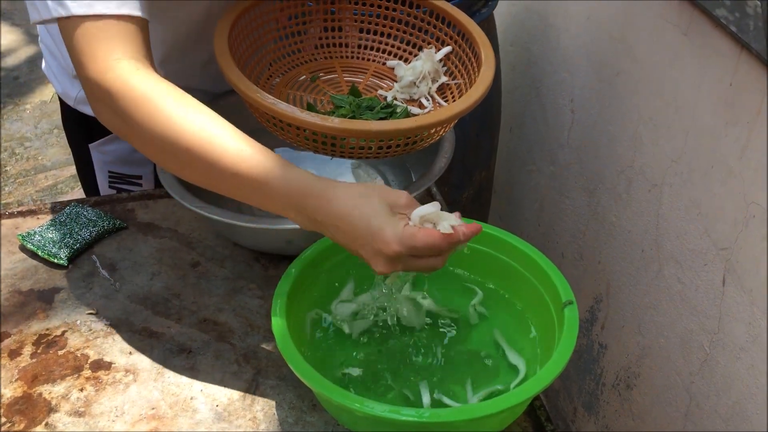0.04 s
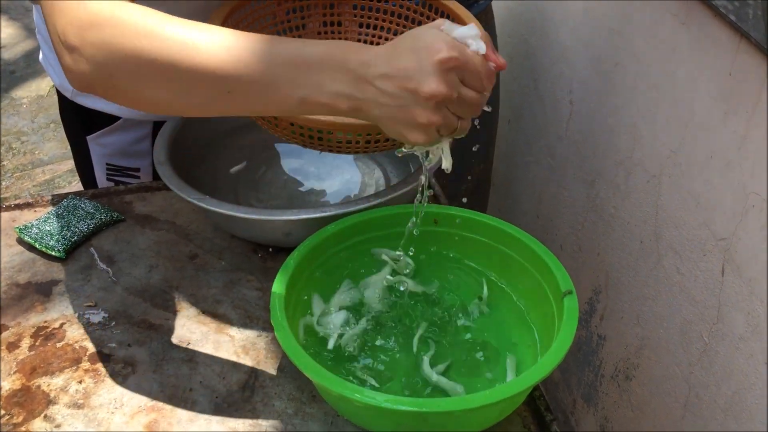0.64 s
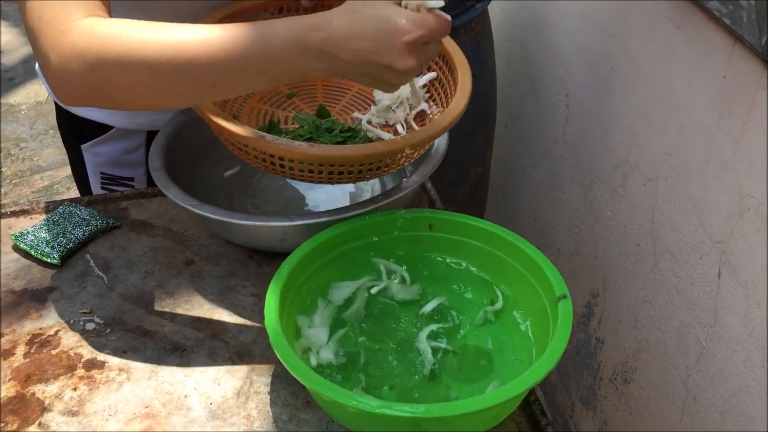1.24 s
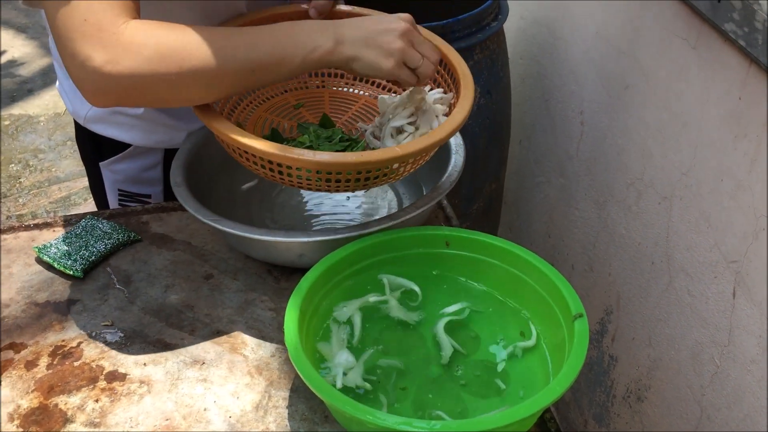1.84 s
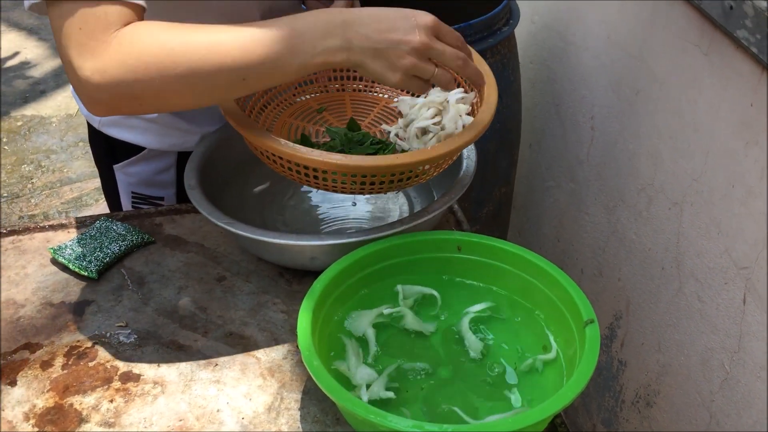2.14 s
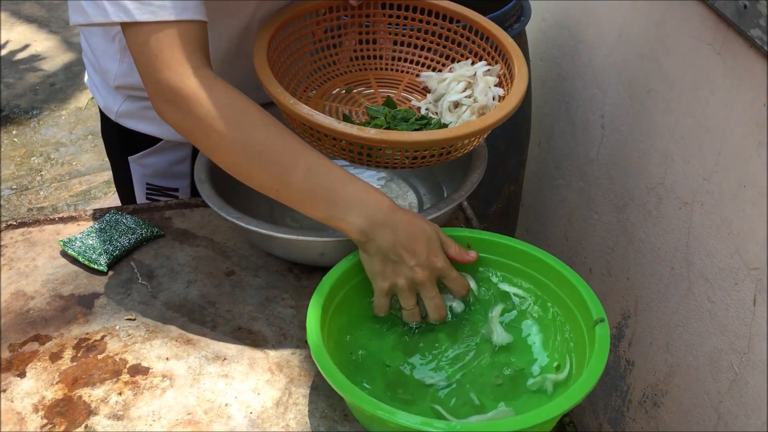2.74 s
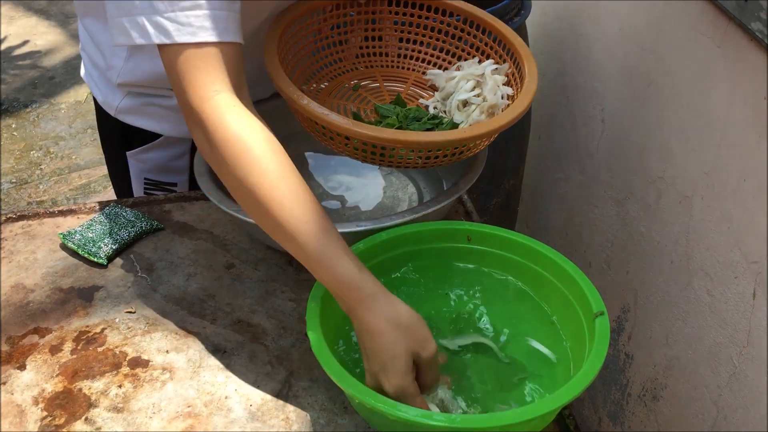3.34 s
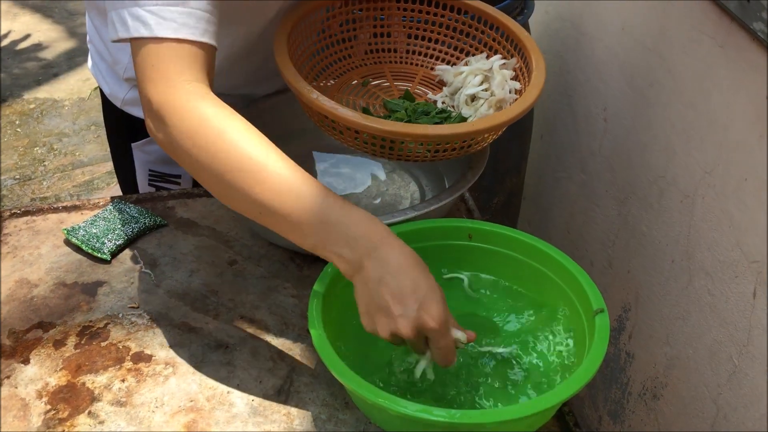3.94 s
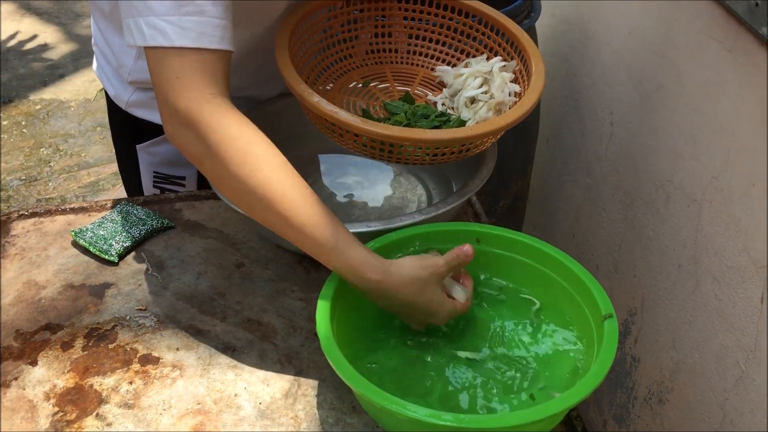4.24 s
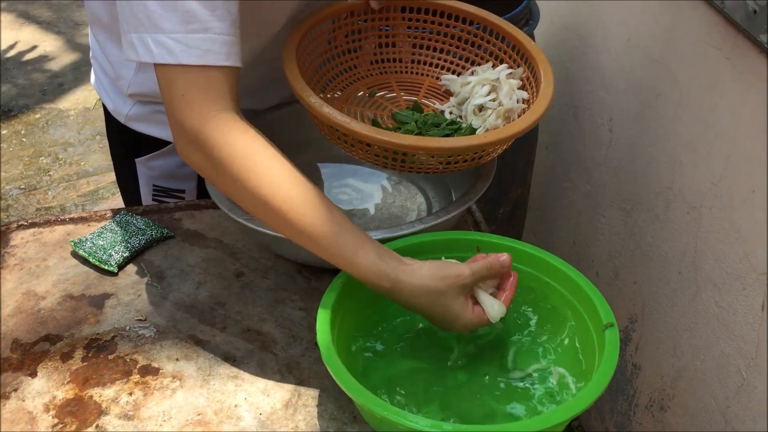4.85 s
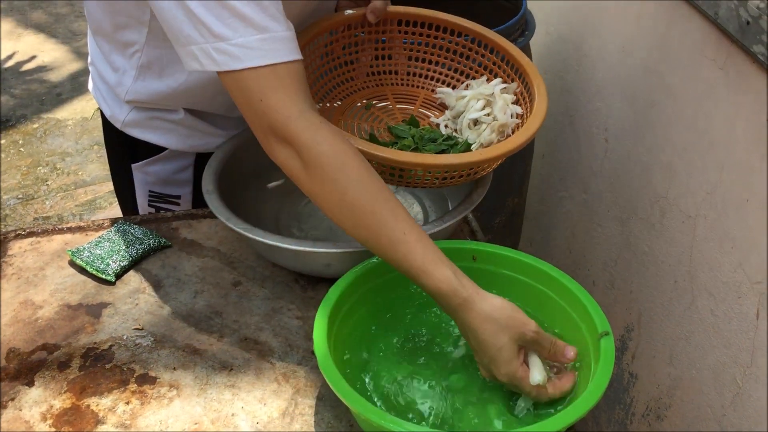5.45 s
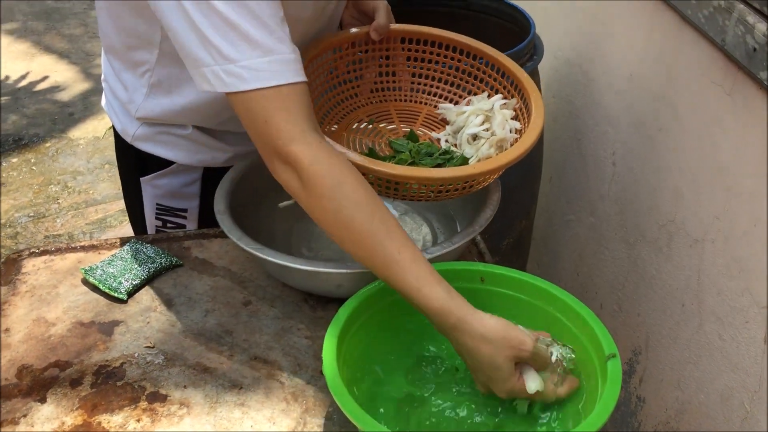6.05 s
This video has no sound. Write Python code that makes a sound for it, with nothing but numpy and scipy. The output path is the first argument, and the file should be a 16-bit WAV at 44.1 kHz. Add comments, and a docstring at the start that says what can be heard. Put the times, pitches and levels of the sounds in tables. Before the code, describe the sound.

Close by, water trickles and plinks into a plastic basin as a hand squeezes wet vegetable strips. After a short lull, the hand dips back in and sweeps around, making small splashes, gulps and drips. Small birds chirp throughout the outdoor yard, and a rooster crows once, faintly, in the second half. Far-off engines hum underneath, one of them passing by.

```python
"""Water trickles and drips into a plastic basin as a hand squeezes vegetable strips, while small birds
chirp between yard walls and an engine drones far off. The hand then dips and sweeps for more.
The water sounds chiefly through trapped air: each bubble is a damped resonator, higher when smaller.
A faint, hollow sound swells in the distance; later a rooster crows once, a harmonic tone turning hoarse
in the middle, and a second engine passes, slowing as it goes."""
import sys
import numpy as np
from scipy import signal
from scipy.fft import rfft, irfft, next_fast_len
from scipy.io import wavfile
from scipy.ndimage import map_coordinates

SR = 44100
rng = np.random.default_rng(int(sys.argv[2]) if len(sys.argv) > 2 else 0)


def transcribe(signal):
    """Save signal, clipped to [-1, 1], as a 16-bit WAV file at the path in sys.argv[1]."""
    frames = np.atleast_2d(signal).T
    limited = np.clip(frames, -1, 1)
    pcm = np.round(limited * 32767).astype(np.int16)
    wavfile.write(sys.argv[1], SR, pcm)


N = 272979

# Levels in the tables are relative: each source applies its own gain.
# spectrum of distant traffic and air: (frequency [Hz], spectral level [dB])
RUMBLE_SPECTRUM = [(20,-32), (35,-26), (52,-4.5), (75,0.5), (115,-2.5), (160,-10), (220,-19), (430,-20),
                   (650,-28), (900,-25), (2000,-31), (10000,-41.5), (16000,-48.5)]
# the near bird's falling chirps: (time [s], duration [s], end frequency [Hz], level [dB])
NEAR_BIRD_CHIRPS = [(0,0.041,3850,-38.5), (0.526,0.056,3960,-42.5), (2.836,0.06,4570,-47.5),
                    (3.548,0.048,3980,-41), (4.373,0.06,3600,-40.5), (4.816,0.071,3650,-38.5),
                    (5.573,0.056,4220,-41), (5.985,0.047,3810,-42.5)]
# the far bird's run of quick chirps: (time [s], level [dB])
FAR_BIRD_CHIRPS = [(3.051,-49.5), (3.291,-42.5), (3.522,-41), (3.747,-39.5), (3.958,-39.5), (4.171,-40.5),
                   (4.619,-39), (5.093,-40.5)]
# thin, drawn-out peeps: (time [s], start frequency [Hz], fall [octaves], level [dB])
BIRD_PEEPS = [(0.401,5000,0.094,-59), (1.099,4515,0.136,-57.5), (1.259,5040,0.081,-63.5),
              (1.753,5400,0.1,-66), (1.99,6140,0.24,-68), (2.049,4800,0.27,-64), (3.081,4390,0.0513,-45),
              (3.893,4220,0.014,-49.5), (5.184,5035,0.28,-48), (5.79,5220,0.14,-64)]
# drops striking the water: (time [s], level [dB], centre frequency [Hz])
DROP_IMPACTS = [(0.206,-43.5,8600), (0.2602,-32,5000), (0.3184,-46,10500), (0.3758,-46,6950),
                (.518,-30.5,3740), (0.57,-40,5400), (0.643,-45,7060), (0.6766,-29,8600),
                (0.7548,-40.5,9900), (0.844,-38.5,6200), (0.866,-55,13000), (.882,-38,3950),
                (0.8873,-32,4480), (0.9196,-40,10300), (1.049,-39,8450), (1.0768,-42.5,7500),
                (1.563,-55,6040), (2.6615,-44,9700), (2.7392,-50.5,6100), (3.3558,-48,8600),
                (3.397,-47,7300), (4.061,-52,10400), (4.1407,-41.5,3560), (4.174,-49,6100),
                (4.711,-53,6000), (5.049,-33,7680), (5.325,-38,6100), (5.422,-36.5,4870),
                (5.438,-50.5,4960), (5.757,-49,2900)]
# air pockets trapped by drops and by the hand:
# (time [s], frequency [Hz], level [dB], life [cycles], initial rise [octaves per 20 ms])
AIR_POCKETS = [(.167,2245,-41,55,0), (0.273,1764,-34.5,97,0.12), (0.323,2680,-40,175,2.36),
               (0.377,2640,-36.5,86,0.88), (0.387,1280,-46,99,1.1), (.398,2090,-45,124,0.051),
               (0.455,1263,-47.5,88,0), (0.521,1302,-43.5,190,0.086), (.569,1646,-28,21,0.046),
               (0.683,1814,-31.5,52,1.13), (.785,3110,-48.5,350,2), (0.817,2015,-36.5,120,0),
               (0.849,2680,-36,60,0.28), (0.89,2210,-35,34,0), (.896,1310,-47,75,0.14),
               (.911,4060,-33,52,0), (0.924,1860,-44,58,0.63), (0.94,982,-36,98,0.17),
               (1.039,3240,-36,38,0.17), (1.064,1880,-46,75,0.031), (1.079,2330,-39.5,90,0.37),
               (2.662,1316,-39.5,26,0), (2.813,2390,-54,100,0.089), (3.129,1700,-43.5,77,0.036),
               (3.179,1855,-49,180,0.35), (3.427,1620,-56,43,0), (3.552,2130,-26.5,18,0.085),
               (3.571,960,-39.5,24,0), (3.769,1810,-38.5,48,0.079), (4.364,3570,-43.5,85,0.86),
               (4.456,1740,-39,25,0.36), (4.472,2780,-35,61,0), (4.524,2604,-38,49,0.28),
               (4.628,3970,-40.5,180,0.29), (4.91,1390,-45,60,.22), (5.026,2620,-41.5,72,0),
               (5.182,2990,-43,100,0.48), (5.29,1590,-44,65,0.22), (5.422,2873,-45,200,0),
               (6.013,1843,-48.5,170,0.027), (6.079,440,-41.5,21,0)]
# spectrum of spray: (frequency [multiples of the centre], spectral level [dB])
SPRAY_SPECTRUM = [(.1, -87), (.35, 4), (.65, 1), (1.3, 4.5), (2.3, 4), (4, -16), (9, -46)]
# water spitting from between fingers and wet strips: (time [s], duration [s], level [dB])
SPIT_BURSTS = [(0.437,0.033,-50.5), (0.57,0.038,-55), (0.991,0.073,-48), (1.272,0.06,-63.5),
               (3.824,0.035,-50), (4.063,0.13,-54.5), (4.656,0.064,-58.5), (5.306,0.041,-49.5)]
# spectrum of the faint, hollow sound far off: (frequency [Hz], spectral level [dB])
FAR_SOUND_SPECTRUM = [(200, -23), (290, 7.5), (600, -15), (950, 0.5), (1500, -19), (3000, -45)]
# envelope of the hand's stirring: (time [s], level [dB])
STIR_ENVELOPE = [(2.4,-71.5), (3.02,-70), (3.25,-112), (3.42,-59), (3.68,-66), (3.85,-62), (4.33,-70),
                 (4.5,-61), (5.3,-64.5), (5.55,-66), (5.95,-72.5), (6.15,-63)]
# the hand slaps or scoops the water: (time [s], rise time [s], spray level [dB], plunge level [dB])
HAND_SPLASHES = [(2.592,0.0051,-49.5,-45.5), (2.64,0.022,-57,-53.5), (2.959,0.055,-60.5,-57),
                 (3.466,0.0064,-51,-54.5), (3.55,0.024,-54,-64), (4.191,0.0032,-30.5,-38.5),
                 (4.432,0.018,-43,-66), (4.785,0.021,-46,-53), (5.246,0.017,-48.5,-36.5),
                 (5.315,0.004,-68,-47), (6.065,0.0044,-40.5,-39.5)]
# resonances of the air under the cupped hand: (frequency [Hz], level [dB])
CAVITY_MODES = [(430, 18), (1050, -13.5), (1340, 14.5), (1675, 12), (2100, 8.5), (2420, 11), (2740, -4.5)]
# spectrum of the filled basin under a plunge: (frequency [Hz], spectral level [dB])
PLUNGE_SPECTRUM = [(50, -17), (140, 8), (330, -4.5), (470, 4), (620, -13.5), (1200, -10), (4000, -57)]
# the crow's short opening note and its long, sagging one:
# (time [s], duration [s], start frequency [Hz], end frequency [Hz], level [dB])
ROOSTER_NOTES = [(3.739,0.231,886,952,-52.5), (4.046,1.15,1120,897,-53.5)]
# harmonics of the crow: (frequency [multiples of the fundamental], level [dB])
ROOSTER_HARMONICS = [(1, 1.5), (2, 3), (3, -4.5)]


def amp(db):
    """Amplitude ratio of a level in decibels."""
    return 10 ** (np.asarray(db) / 20)


def unit(x):
    """Normalisation to rms 1."""
    return x / np.sqrt(np.mean(x ** 2) + 1e-20)


def seconds(length):
    """A uniformly sampled time axis."""
    return np.arange(int(length * SR)) / SR


def wobble(rate, size=N):
    """Smooth random modulation of rms 1, with rate knots a second."""
    return unit(map_coordinates(rng.standard_normal(int(size * rate / SR) + 8),
                                [np.arange(size) * rate / SR]))


def phase(hz):
    """Phase as the time integral of frequency."""
    return 2 * np.pi * np.cumsum(hz) / SR


def bell(centre, width):
    """A Gaussian envelope of peak 1; times in seconds."""
    return np.exp(-.5 * ((np.arange(N) / SR - centre) / width) ** 2)


def held(start, end, attack, release):
    """A trapezoidal envelope; times in seconds."""
    t = np.arange(N) / SR
    return np.clip(np.minimum((t - start) / attack, (end - t) / release), 0, 1)


def noise(points, size=N, scale=1):
    """Spectral shaping of noise, rms 1, by (frequency, level) points; scale multiplies the frequencies."""
    m = next_fast_len(size)
    hz, db = np.transpose(points)
    gain = amp(np.interp(np.log(np.fft.rfftfreq(m, 1 / SR) + 1), np.log(hz * scale), db))
    return unit(irfft(rfft(rng.standard_normal(m)) * gain, m)[:size])


def add(track, s, sound):
    """Superposition of a sound on the track at s seconds."""
    start = int(np.clip(round(s * SR), 0, N))
    track[start:start + len(sound)] += sound[:N - start]


def echo(x, t60, delay):
    """Diffuse reflection: convolution with exponentially decaying noise of unit energy."""
    t = seconds(.7)
    tail = rng.standard_normal(len(t)) * amp(-60 * t / t60) * (t > delay)
    return signal.fftconvolve(x, tail / np.linalg.norm(tail))[:len(x)]


def traffic(drone_hz=93.65, fast_hz=140, slow_hz=109.7, nearest_s=4.78):
    """Two engines hum at their firing rates over a rumble; the passing one obeys the 1/distance law."""
    t = np.arange(N) / SR
    drone_gain = amp(-58.5 + 10 * bell(centre=4.86, width=0.9) + 2.93 * wobble(6.1))
    drone = drone_gain * unit(np.sin(phase(drone_hz * (1 + 0.01324 * wobble(7)))))
    slowed = (1 + np.tanh((t - 4.95) / 0.346)) / 2
    firing_hz = (fast_hz + (slow_hz - fast_hz) * slowed) * (1 + 0.012 * wobble(12))
    distance = np.hypot(1, (t - nearest_s) / 0.56)  # in multiples of the closest approach
    passing = amp(-52 + 4.6 * wobble(17)) / distance * unit(np.sin(phase(firing_hz)))
    return drone + passing + amp(-53) * noise(RUMBLE_SPECTRUM)


def whistles(calls, bend, waver, direct_db, echo_db, t60, rasp_db=3):
    """Gliding tones, roughened by modulation, reflect off the yard walls; bend over 1 delays the fall."""
    out = np.zeros(N)
    for s, length, start_hz, end_hz, db in calls:
        progress = seconds(length) / length
        glide_hz = start_hz + (end_hz - start_hz) * progress ** bend
        hz = glide_hz * (1 + waver * wobble(811, len(progress)))
        rasp = unit(amp(rasp_db * wobble(219.3, len(progress))))
        note = np.sin(phase(hz)) * rasp * np.sin(np.pi * progress) ** 0.29
        note = np.pad(note, (0, SR // 2))  # room for the reverberation
        add(out, s, amp(db) * (amp(direct_db) * note + amp(echo_db) * echo(note, t60, delay=0.0026)))
    return out


def birds(near_start_hz=6640, far_start_hz=6307, far_end_hz=2570, far_chirp_s=0.046, peep_s=0.09):
    """Two birds chirp amid softer peeps; the farther has the lower direct-to-reverberant ratio."""
    near = [(s, length, near_start_hz, end_hz, db) for s, length, end_hz, db in NEAR_BIRD_CHIRPS]
    far = [(s, far_chirp_s, far_start_hz, far_end_hz, db) for s, db in FAR_BIRD_CHIRPS]
    peeps = [(s, peep_s, hz, hz / 2 ** fall, db) for s, hz, fall, db in BIRD_PEEPS]
    return (whistles(near, bend=1.1, waver=0.02, direct_db=-4.5, echo_db=0.5, t60=0.32)
            + whistles(far, bend=0.79, waver=0.04, direct_db=-8, echo_db=0, t60=0.39)
            + whistles(peeps, bend=0.69, waver=0.013, direct_db=5.5, echo_db=0, t60=0.43))


def bubble(hz, t60, rise, waver=0):
    """Damped resonance of trapped air; its pitch climbs near the surface and wavers in rough water."""
    t = seconds(t60)
    octaves = np.tanh(rise * t / .02)
    if waver:
        octaves = octaves + waver * wobble(400, len(t))
    onset = 1 - np.exp(-(t * hz) ** 2)
    return np.sin(phase(hz * 2 ** octaves)) * amp(-60 * t / t60) * onset


def splatter(hz, size, spread, cycles, linger, count=6):
    """Air entrainment: an impact sets a few tiny bubbles ringing within milliseconds; rms 1."""
    out = np.zeros(N)
    for k, (pitch, pause) in enumerate(rng.standard_normal((count, 2))):
        own_hz = min(hz * 2 ** (spread * pitch), SR / 3)
        birth_s = linger * k / count * np.exp(pause / 2)
        add(out, birth_s, bubble(own_hz, cycles / own_hz, rise=0) / (1 + k / 2))
    return unit(out[:size])


def patter(rate, centre_hz, spread=0.7, scatter_db=14):
    """Shot noise of droplets landing at random, each a brief splatter; rms 1."""
    out = np.zeros(N)
    for when, pitch, strength in rng.random((int(rate * N / SR), 3)):
        hz = centre_hz * 2 ** (spread * (2 * pitch - 1))
        tick = splatter(hz, size=SR // 50, spread=0.388, cycles=46, linger=.002, count=4)
        add(out, when * N / SR, amp(scatter_db * strength) * tick)
    return unit(out)


def fizz(rate, centre_hz, spread, cycles, scatter_db):
    """Incoherent sum of bubbles starting within spread octaves of the centre; rms 1."""
    out = np.zeros(N)
    for when, pitch, strength in rng.random((int(rate * N / SR), 3)):
        hz = min(centre_hz * 2 ** (spread * (2 * pitch - 1)), SR / 3)
        gain = amp(-scatter_db * np.log(1 - .97 * strength))  # many weak, few strong
        add(out, when * N / SR, gain * bubble(hz, cycles / hz, rise=0.42))
    return unit(out)


def spatter():
    """Dense, short-lived bubble resonances overlap into a wet broadband noise; rms 1."""
    return fizz(rate=600, centre_hz=2600, spread=1.5, cycles=24, scatter_db=3.5)


def squeeze(spatter_db=-63.5, patter_db=-59):
    """The flow from the squeezed handful modulates the amplitude of a spatter and a fine patter."""
    draining = held(start=0.0051, end=1.133, attack=0.17, release=0.14)
    pause = held(start=0.61, end=0.83, attack=0.19, release=0.042)  # between two shakes
    droplets = patter(rate=110, centre_hz=7000)
    return draining * (1 - pause) * (amp(spatter_db) * spatter() + amp(patter_db) * droplets)


def drips(snap_t60=0.015, spatter_t60=0.12, hard_db=-28, low_cut_hz=750, plink_db=5.5, pinch_db=-21):
    """Impact and resonance: drops snap, pop and splatter; air pockets pinch off with a tick and ring."""
    impacts, wetness = np.zeros(N), np.zeros(N)
    t, tail_t = seconds(.03), seconds(.2)
    snap_spectrum = [(.12, -30), (.6, -6.5), (1.25, -2.5), (3.2, -5)]
    for s, db, hz in DROP_IMPACTS:
        snap = unit(noise(snap_spectrum, len(t), scale=hz) * amp(-60 * t / snap_t60))
        hardness = amp((db - hard_db) / 2)  # harder drops have more snap and pop
        cluster = splatter(hz, len(t), spread=0.38, cycles=28, linger=0.0043)
        add(impacts, s, amp(db) * (amp(-6.5) * cluster + hardness * amp(-9) * snap))
        add(impacts, s, amp(db + 6) * hardness * bubble(hz=2300, t60=0.0049, rise=0.64))
        add(wetness, s, amp(db - 19 - 60 * tail_t / spatter_t60))
    highpass = signal.butter(3, low_cut_hz, "high", fs=SR, output="sos")
    out = signal.sosfilt(highpass, impacts + wetness * spatter())
    for s, hz, db, cycles, rise in AIR_POCKETS:
        ring = bubble(hz, cycles / hz, rise, waver=.03)
        add(out, s, amp(db + plink_db + 2 * wobble(220, len(ring))) * ring)
        tick = amp(-60 * t / t[-1]) * noise(SPRAY_SPECTRUM, len(t), scale=hz)
        add(out, s, amp(db + plink_db + pinch_db) * tick)
    return out


def spitting(bubbles_db=-5):
    """Short pulses of flow excite small bubbles and a fine spray that sputters by random modulation."""
    flow = np.zeros(N)
    for s, length, db in SPIT_BURSTS:
        add(flow, s, amp(db) * np.sin(np.pi * seconds(length) / length) ** .5)
    sputter = unit(amp(5 * wobble(130)))
    spray = fizz(rate=1500, centre_hz=6100, spread=1.1, cycles=20, scatter_db=3)
    bubbles = fizz(rate=400, centre_hz=3000, spread=.5, cycles=40, scatter_db=2)
    return flow * (sputter * spray + amp(bubbles_db) * bubbles)


def far_sound(db=-61):
    """Two spectral peaks give a hollow timbre to a faint noise that swells and fades far away."""
    return amp(db) * bell(centre=2.18, width=0.15) * noise(FAR_SOUND_SPECTRUM)


def stirring(patter_db=-6, wash_db=-12, wash_hz=2600, swish_db=-69, swish_hz=1700):
    """Water moved by the hand swishes, entrains small ringing bubbles and sheds droplets in clumps."""
    t = np.arange(N) / SR
    times, levels_db = np.transpose(STIR_ENVELOPE)
    motion = amp(np.interp(t, times, levels_db)) * (t > times[0])
    clumps = unit(amp(4 * wobble(30)))
    bubbles = fizz(rate=140, centre_hz=2500, spread=.85, cycles=32, scatter_db=4.5)
    droplets = amp(patter_db) * patter(rate=130, centre_hz=8500)
    wash = amp(wash_db) * noise(SPRAY_SPECTRUM, scale=wash_hz)
    immersed = held(start=2.45, end=5.7, attack=0.15, release=0.23)
    swish = amp(swish_db) * immersed * noise(SPRAY_SPECTRUM, scale=swish_hz)
    return swish + motion * (bubbles + clumps * (droplets + wash))


def hand_cavity(x, size, q=13):
    """Cavity resonance of the air under the hand: frequencies vary inversely with size; rms 1."""
    return unit(sum(amp(db) * signal.lfilter(*signal.iirpeak(hz / size, q, fs=SR), x)
                    for hz, db in CAVITY_MODES))


def splashes(spray_hz=1900, spray_t60=0.14, plunge_t60=0.3, cavity_open_s=0.0095):
    """The hand's impact excites a cavity, a frothing spray and a low gulp, all decaying exponentially."""
    out, churn, t = np.zeros(N), np.zeros(N), seconds(.5)
    for s, rise_s, spray_db, plunge_db in HAND_SPLASHES:
        swell = np.minimum(t / rise_s, 1)
        since_collapse = np.maximum(t - rise_s - cavity_open_s, 0)
        force = amp(spray_db - 60 * since_collapse / spray_t60) * swell
        spray = unit(noise(SPRAY_SPECTRUM, len(t), scale=spray_hz) * amp(4 * wobble(437, len(t))))
        cavity_size = 2 ** rng.uniform(-.06, .06)
        ring = hand_cavity(rng.standard_normal(len(t)), cavity_size)
        add(out, s, force * amp(-4) * (spray + ring))
        gulp = unit(noise(PLUNGE_SPECTRUM, len(t), scale=1 / cavity_size) * amp(3 * wobble(96, len(t))))
        add(out, s, amp(plunge_db - 1.5 - 60 * since_collapse / plunge_t60) * swell * gulp)
        add(churn, s, force)
    froth = fizz(rate=450, centre_hz=1800, spread=1, cycles=36, scatter_db=2)
    return out + amp(-8) * churn * froth


def rooster(gain_db=-2, waver=0.016, jitter=0.075, rasp_db=3.5, flutter_db=3):
    """A harmonic crow, heard mostly by reflection; jitter and shimmer make its middle hoarse."""
    t, voice = np.arange(N) / SR, np.zeros(N)
    hoarseness = 0.3 + 0.7 * held(start=3.95, end=4.88, attack=0.199, release=0.15)
    for s, length, start_hz, end_hz, db in ROOSTER_NOTES:
        hz = np.interp(t, [s, s + length], [start_hz, end_hz]) * (1 + waver * wobble(20))
        angle = phase(hz * (1 + jitter * hoarseness * wobble(300)))
        note = sum(amp(harmonic_db) * np.sin(round(k) * angle) for k, harmonic_db in ROOSTER_HARMONICS)
        gain = amp(db + gain_db + flutter_db * wobble(18))
        shimmer = amp(rasp_db * hoarseness * wobble(260))
        voice += gain * held(s, s + length, attack=0.049, release=0.062) * unit(note * shimmer)
    return voice / 3 + echo(voice, t60=0.11, delay=0.011)


def scene(basin_db=-10, yard_db=-18):
    """Superposition of the close water, its reflections from basin and yard, and the neighbourhood."""
    water = drips() + squeeze() + spitting() + splashes() + stirring()
    basin = amp(basin_db) * echo(water, t60=0.031, delay=0.0016)
    yard = amp(yard_db) * echo(water, t60=0.1, delay=0.011)
    return (water + basin + yard + birds() + rooster() + far_sound() + traffic())[None]


def record(dry, cutoff_hz=16500):
    """Band limiting: a steep low-pass filter removes the highest treble."""
    m = next_fast_len(N + SR // 2)
    gain = 1 / (1 + (np.fft.rfftfreq(m, 1 / SR) / cutoff_hz) ** 150)
    return irfft(rfft(dry, m) * gain, m)[..., :N]


dry = scene()
out = record(dry)
transcribe(out)
```